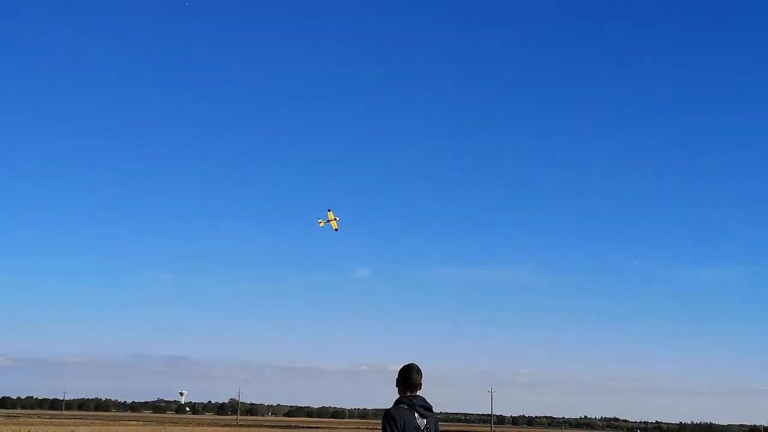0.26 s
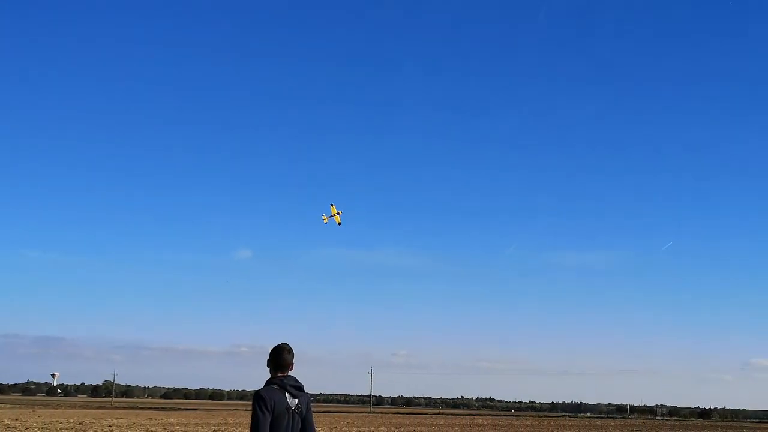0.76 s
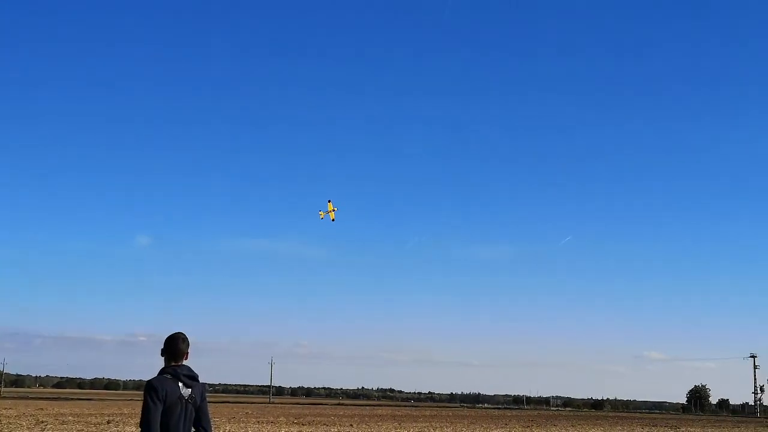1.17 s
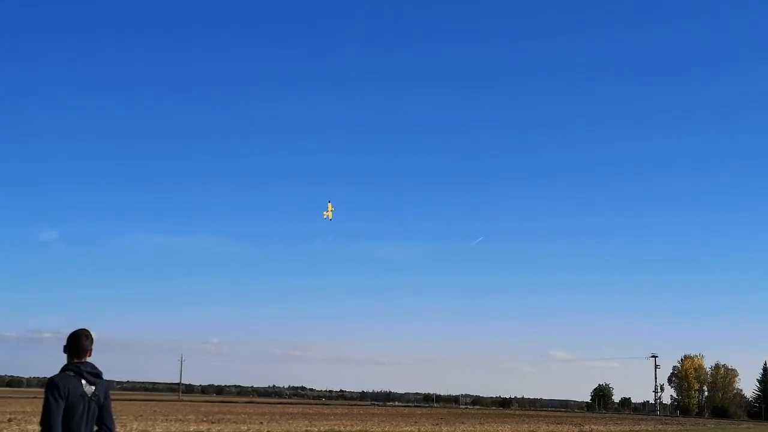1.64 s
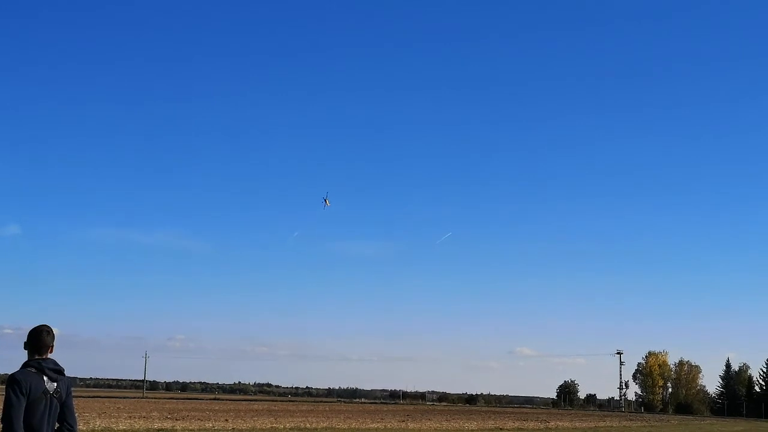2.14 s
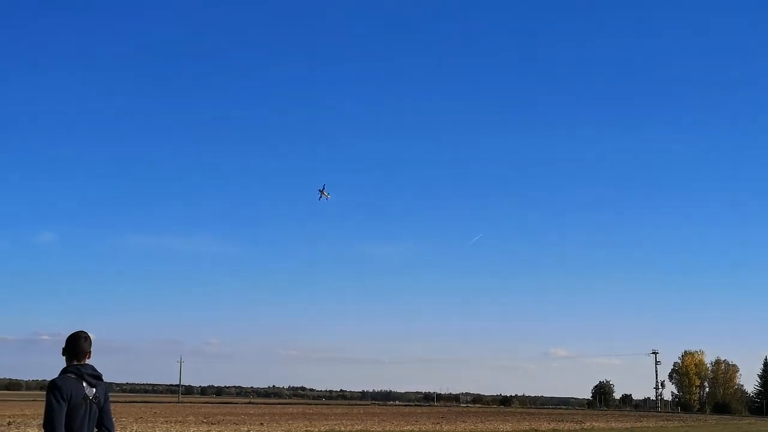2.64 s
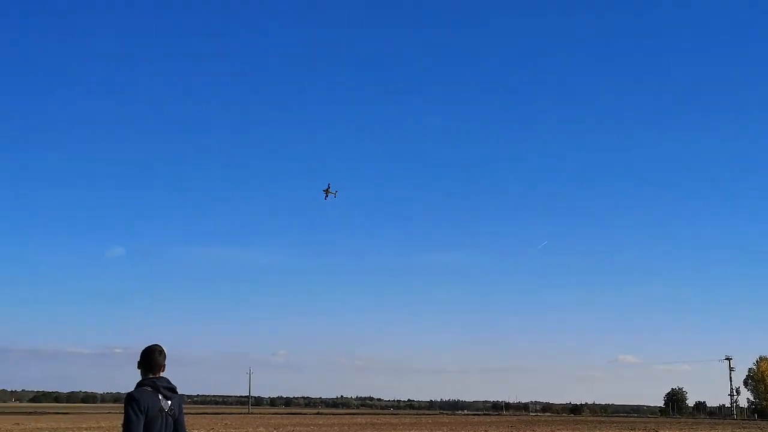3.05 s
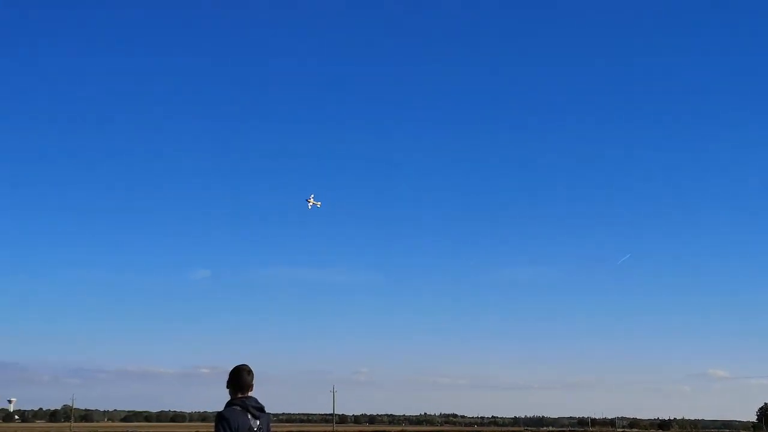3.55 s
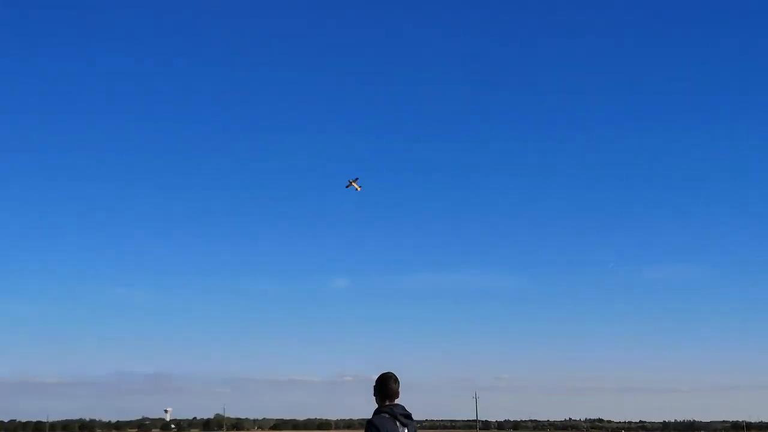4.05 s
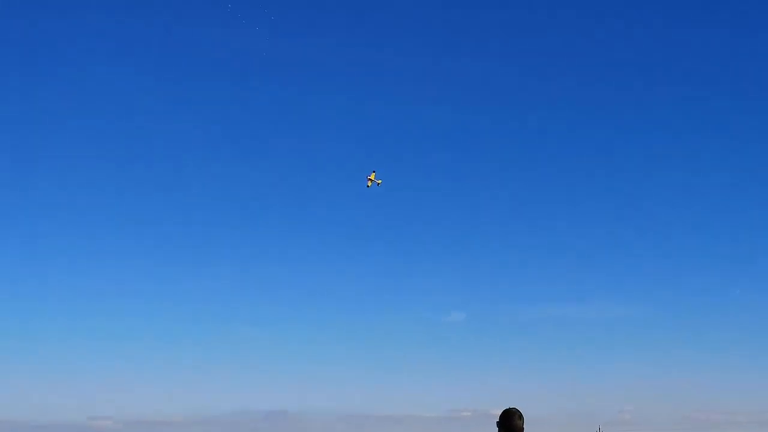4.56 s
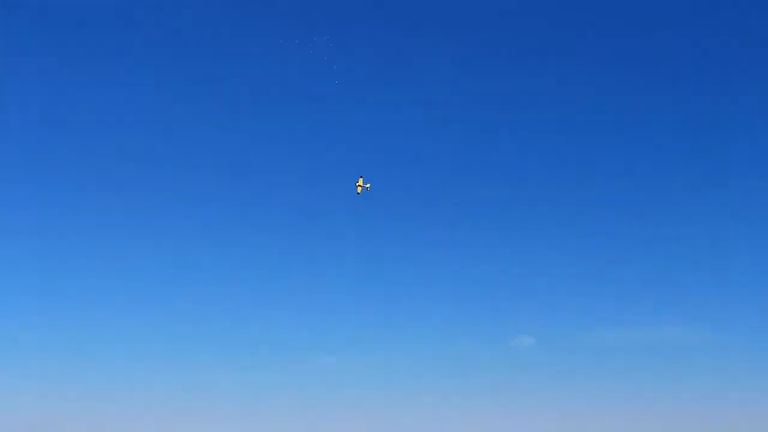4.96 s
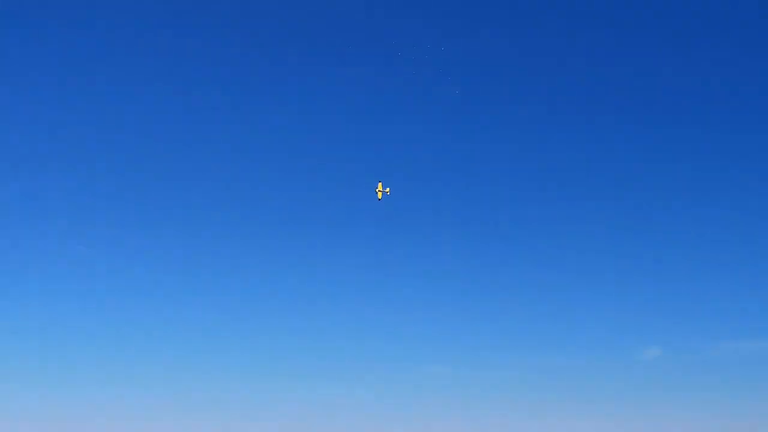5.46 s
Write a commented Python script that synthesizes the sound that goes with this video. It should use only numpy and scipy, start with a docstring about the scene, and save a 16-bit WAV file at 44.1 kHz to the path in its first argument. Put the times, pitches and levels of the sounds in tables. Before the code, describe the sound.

A model plane flies over an open, flat field, heard from the ground in stereo with wind striking the microphone. From 0 to 1 s its single-cylinder two-stroke holds a low, slightly rough buzz around 84 firings a second, with a deep propeller thrum, partly masked by gusts, thuds and brief crackles. It revs up to about 93 by 1.6 s, then eases and stumbles slightly near 1.9 s. Wind flutters again around 2.0-2.5 s while the exhaust stays subdued. From 2.7 s the engine swells strongly, nasal and raspy, loudest around 3-4.3 s, its ringing overtones and hiss sweeping as the plane turns; pitch climbs to about 99. The wind is calmer here, then buffets hard at 4.3-5.0 s. At about 4.8 s the throttle closes: pitch falls quickly to roughly 71, duller, quieter, with uneven alternate firings, rising faintly at the end near 5.7 s.

```python
"""Over an open field, a model aerobatic plane hangs on its propeller, pulls away, then throttles back.
Each firing of its single-cylinder two-stroke rings the exhaust and lets out a rasp of gas; when the
engine stumbles, every other firing is weak and late. The two-bladed propeller thrums and swishes.
The ground mirrors and scatters the sound. Gusty wind, made of shaped noise, buffets the two
microphone ports, over a faint hiss of open air."""
import sys
import numpy as np
from scipy import signal
from scipy.fft import rfft, irfft, next_fast_len
from scipy.io import wavfile
from scipy.ndimage import uniform_filter1d, map_coordinates

SR = 44100
rng = np.random.default_rng(int(sys.argv[2]) if len(sys.argv) > 2 else 0)


def pcm_store(signal):
    """Save signal as 16-bit PCM."""
    levels = np.round(np.clip(np.atleast_2d(signal), -1, 1) * 32767)
    wavfile.write(sys.argv[1], SR, levels.astype(np.int16).T)


N = 251811
T = np.arange(N) / SR  # time in seconds


def plane():
    """Firings and gas ring the exhaust, the propeller thrums and swishes, and the ground adds an echo."""
    turns, pulses = engine()
    thrum, swish = propeller(turns)
    pure, clean, raspy, breathy = drives(pulses, swish)
    direct = top_cut(exhaust(pure, clean, raspy, breathy) + thrum)
    return at_ports(direct) + top_cut(beams(raspy)) * pan(-4)


# engine speed as heard: (time_s, firings_hz)
ENGINE_SPEED = [(0, 83.24), (.45, 84.3), (.68, 84.5), (.8, 85.4), (1.03, 84.04), (1.15, 85.6), (1.3, 89.33),
                (1.53, 93.17), (1.65, 93.36), (1.88, 90.8), (2.15, 88), (2.6, 88.03), (2.8, 89.52),
                (3.2, 90.07), (3.5, 91.1), (3.62, 91.7), (3.76, 93.85), (4.0, 96), (4.2, 97.1),
                (4.35, 99.27), (4.7, 98.06), (4.78, 96.8), (5.0, 78.3), (5.2, 71.12), (5.5, 71.98),
                (5.71, 74.6)]
# how badly the engine stumbles: (time_s, stumble from 0 to 1)
ENGINE_STUMBLE = [(.1, 0.4), (.4, 0.2), (1.0, .3), (1.25, 0), (1.55, 0.06), (1.75, 0.3), (1.92, 0.3),
                  (2.1, 0), (2.7, 0), (4.7, 0), (4.8, 0.5), (5.1, 0.89)]


def engine():
    """The shaft turns at the engine speed and the cylinder fires once a turn."""
    firing_hz, = curves(ENGINE_SPEED)
    stumble = np.clip(curves(ENGINE_STUMBLE)[0], 0, 1)
    turns = np.cumsum(firing_hz) / SR
    pulses = firings(
        turns,
        weak_db=6.5 * stumble,
        late_ms=0.6 * stumble,
        scatter_ms=0.016 + 0.09 * stumble,
        scatter_db=0.95 + 1.4 * stumble)
    return turns, unit(pulses)


def firings(turns, weak_db, late_ms, scatter_ms, scatter_db):
    """One pulse a turn; a weak, late firing follows each strong one when the engine stumbles."""
    count = np.arange(1, int(turns[-1]))
    odd = count % 2  # the strong firings
    timing, strength = rng.standard_normal((len(count), 2)).T
    at = np.searchsorted(turns, count)
    shift_ms = timing * scatter_ms[at] - odd * late_ms[at]
    place = (np.interp(count, turns, T) + shift_ms / 1000) * SR
    size = undb(weak_db[at] * odd + scatter_db[at] * strength)
    # keep the average strength of neighbouring firings steady
    size = size / np.sqrt(uniform_filter1d(size ** 2, size=8))
    # a short sinc places each pulse between samples
    taps = place.astype(int)[:, None] + np.arange(-7, 9)
    pulse = size[:, None] * np.sinc(taps - place[:, None])
    return np.bincount(np.clip(taps, 0, N - 1).ravel(), pulse.ravel(), N)


def drives(pulses, swish):
    """What rings the exhaust: the higher the resonance, the more of its drive is turbulence."""
    puffs = gas(pulses, decay_ms=4.2)
    pure = pulses + 0.04 * puffs + 0.12 * swish
    clean = pulses + 0.07 * puffs + 0.3 * swish
    raspy = pulses + 0.3 * puffs + 0.4 * swish
    breathy = pulses + 1.7 * gas(pulses, decay_ms=2.4) + 0.45 * swish
    return pure, clean, raspy, breathy


def gas(pulses, decay_ms):
    """A puff of turbulent gas that dies away after each firing."""
    pole = np.exp(-1000 / (decay_ms * SR))
    return unit(signal.lfilter([1], [1, -pole], pulses) * rng.standard_normal(N))


# how the exhaust carries as the plane turns, before each layer's own trim:
# (time_s, bark_db, silencer_ring_db, rasp_db, sizzle_db)
EXHAUST_LEVELS = [(0.1, -52, -59, -58.5, -67), (.26, -54, -59, -65, -65), (.39, -53.5, -57, -73, -78.5),
                  (.52, -54.5, -64.5, -70.5, -75.5), (.62, -53.5, -55.5, -63.5, -72),
                  (.92, -64.5, -64.5, -69.5, -70), (1.15, -50.5, -57.5, -74, -79.5),
                  (1.45, -48.5, -59.5, -61, -72), (1.57, -50.5, -55, -63.5, -71),
                  (1.87, -53, -50, -64.5, -68.5), (2.06, -49.5, -59, -66, -69),
                  (2.39, -64.5, -56, -70.5, -71.5), (2.51, -51, -55.5, -75.5, -86),
                  (2.77, -47.5, -40, -56, -74), (2.93, -43, -43.5, -58.5, -67),
                  (3.11, -38, -40, -47.5, -55.5), (3.4, -39.5, -43, -57.5, -60.5),
                  (3.99, -40, -43.5, -46.5, -58), (4.29, -37.5, -51.5, -51.5, -60),
                  (4.42, -45, -46, -62, -67), (4.58, -47.5, -58, -51.5, -63), (4.68, -43, -56.5, -57, -75),
                  (4.79, -44, -53.5, -57.5, -64), (5.05, -63.5, -61.5, -91, -82),
                  (5.15, -54, -59, -76, -77.5), (5.55, -59, -56.5, -86, -82), (5.68, -51.5, -53, -76, -66)]


def exhaust(pure, clean, raspy, breathy):
    """The exhaust rings in layers, from the low bark up to the fizz."""
    bark_db, ring_db, rasp_db, sizzle_db = curves(EXHAUST_LEVELS)
    low = bark(pure, bark_db) + silencer_ring(clean, ring_db) + honk(pure)
    middle = silencer_overtone(clean) + whine(raspy) + rasp(raspy, rasp_db)
    return low + middle + sizzle(breathy, sizzle_db) + fizz(breathy)


# low resonances: (pitch_hz, width_hz, level_db against each other, left_minus_right_db)
BARK_MODES = [(254, 120, 10.5, -6), (507, 210, 4, 5.5), (777, 170, 4, 2.5)]


def bark(drive, level_db):
    """The firings ring the lowest, strongest resonances of the exhaust."""
    return resonate(drive, BARK_MODES) * undb(level_db + 1.5)


# silencer resonance, then evened to rms 1: (pitch_hz, width_hz, level_db, left_minus_right_db)
RING_MODES = [(1833, 355, -13, 0.2)]
# the ring shifts with the plane's heading: (time_s, centre_hz, further left_minus_right_db)
RING_HEADING = [(0.1, 1833, -13), (.65, 1830, -10), (.87, 1703, -3), (1.05, 1790, -12.5), (1.38, 1825, -9),
                (1.6, 1774, 8), (1.85, 1730, -6), (2.3, 1700, -3.5), (2.8, 1650, -5.5), (3.15, 1687, -6.5),
                (3.57, 1700, -7), (3.95, 1834, -9.5), (4.6, 1710, -3.5), (4.85, 1830, -2),
                (5.3, 1727, -5.5)]


def silencer_ring(drive, level_db):
    """The silencer rings, its pitch and side moving with the plane's heading."""
    centre_hz, side_db = curves(RING_HEADING)
    ring = sweep(resonate(drive, RING_MODES), centre_hz, width_hz=120)
    return ring * undb(level_db + 1) * pan(side_db)


# resonances: (pitch_hz, width_hz, level_db against each other, left_minus_right_db)
HONK_MODES = [(1006, 270, 3, 6), (1117, 340, -3.5, 5)]
# how the honk moves as the plane turns, before a 1 dB cut: (time_s, level_db, centre_hz)
HONK_PATH = [(.1, -56.5, 1126), (.55, -61.5, 1078), (1.0, -61.5, 1097), (1.42, -52, 1058),
             (1.6, -60.5, 1118), (2.5, -61.5, 1120), (2.78, -46.5, 1060), (3.14, -43.5, 1090),
             (3.42, -46, 1093), (3.78, -45.5, 1132), (4.0, -39.5, 1152), (4.3, -46.5, 1038),
             (4.68, -53, 1006), (4.79, -46, 956), (5.05, -62.5, 908), (5.68, -55, 1020)]


def honk(drive):
    """A nasal resonance above the bark, its level and pitch moving as the plane turns."""
    level_db, centre_hz = curves(HONK_PATH)
    return sweep(resonate(drive, HONK_MODES), centre_hz, width_hz=240) * undb(level_db - 1)


# resonance, then evened to rms 1: (pitch_hz, width_hz, level_db, left_minus_right_db)
OVERTONE_MODES = [(2203, 260, -8.5, 0)]
# how the overtone moves, before a 4.5 dB cut: (time_s, level_db, centre_hz)
OVERTONE_PATH = [(.1, -72.5, 2136), (1.0, -68, 2204), (1.15, -61.5, 2316), (1.7, -54, 2140),
                 (2.3, -75, 2136), (2.9, -63, 2206), (3.1, -53, 2230), (3.45, -52.5, 2300),
                 (3.65, -54.5, 2200), (3.83, -45.5, 2290), (4.2, -50, 2197), (4.55, -49.5, 2163),
                 (4.65, -63.5, 2120), (4.85, -57, 2210), (5.1, -78, 2210)]


def silencer_overtone(drive):
    """The silencer's overtone, which swells and fades as the plane rocks."""
    level_db, centre_hz = curves(OVERTONE_PATH)
    tone = sweep(resonate(drive, OVERTONE_MODES), centre_hz, width_hz=150)
    return tone * undb(level_db - 4.5 + rocking_db())


# resonance, then evened to rms 1: (pitch_hz, width_hz, level_db, left_minus_right_db)
WHINE_MODES = [(2795, 620, 0, 5)]
# the whine beams out in lobes that sweep past as the plane turns: (time_s, level_db, centre_hz)
WHINE_PATH = [(0.1, -55, 2555), (.32, -60.5, 2666), (.45, -58.5, 2705), (.65, -59.5, 2585),
              (.85, -65, 2535), (1.1, -59.5, 2406), (1.78, -59.5, 2630), (2.05, -60, 2754),
              (2.5, -64.5, 2520), (2.72, -47.5, 2506), (3.1, -46, 2455), (3.6, -59, 2390),
              (4.03, -47, 2950), (4.42, -62.5, 2696), (4.87, -58, 2327), (5.02, -65.5, 2386),
              (5.65, -68.5, 2630)]


def whine(drive):
    """A narrow, high resonance that comes and goes in lobes."""
    level_db, centre_hz = curves(WHINE_PATH)
    tone = sweep(resonate(drive, WHINE_MODES), centre_hz, width_hz=170)
    return tone * undb(level_db + rocking_db())


# resonances: (pitch_hz, width_hz, level_db against each other, left_minus_right_db)
RASP_MODES = [(3340, 640, 1.1, -14), (3900, 670, 1.9, -8.5)]
# the rasp shifts with the plane's heading: (time_s, centre_hz)
RASP_PATH = [(.2, 3440), (1.4, 3314), (2.5, 3396), (3.1, 3570), (3.6, 3570), (3.95, 3420), (4.15, 3730),
             (4.4, 3820), (4.8, 3850)]


def rasp(drive, level_db):
    """Firings and gas ring a wide treble band whose centre moves."""
    centre_hz, = curves(RASP_PATH)
    band = sweep(resonate(drive, RASP_MODES), centre_hz, width_hz=600)
    return band * undb(level_db + rocking_db())


# treble bands: (pitch_hz, width_hz, level_db added to the sizzle, left_minus_right_db)
SIZZLE_MODES = [(5250, 790, -3, -0.5), (5690, 580, -8.5, -6.5)]


def sizzle(drive, level_db):
    """Gas hisses through treble bands that shimmer one by one."""
    return sum(resonate(drive, [mode]) * undb(level_db + mode[2] + shimmer_db())
               for mode in SIZZLE_MODES)


# highest band, then evened to rms 1: (pitch_hz, width_hz, level_db, left_minus_right_db)
FIZZ_MODES = [(7120, 1300, -1, 0.5)]
# loudness of the fizz: (time_s, level_db)
FIZZ_LEVELS = [(0, -65), (.28, -83), (.4, -80.5), (.62, -79), (1.1, -88), (1.38, -89), (1.54, -77),
               (1.67, -81.5), (1.8, -85), (2.03, -77), (2.15, -85.5), (2.35, -72), (2.52, -89), (2.9, -74),
               (3.12, -65), (3.6, -69), (3.8, -68), (4.18, -66.5), (4.42, -75), (4.8, -84), (5.0, -87),
               (5.7, -83)]


def fizz(drive):
    """The highest hiss of the gas, shimmering too."""
    return resonate(drive, FIZZ_MODES) * undb(curves(FIZZ_LEVELS)[0] + shimmer_db())


def rocking_db():
    """The upper resonances swell and fade as the plane rocks."""
    return 3 * walk(6)


def shimmer_db():
    """Moving air makes a treble band swell and fade."""
    return 2.5 * walk(13)


# bands of exhaust that flash past, filtered twice:
# (centre_s, centre_to_edge_s, pitch_hz, width_hz of one filter pass, level_db before a shared pan)
BEAM_EVENTS = [(.18, 0.19, 3430, 600, -63), (.62, .086, 2850, 500, -59.5), (1.26, 0.12, 3550, 330, -64),
               (1.38, 0.11, 2230, 502, -58.5), (1.47, 0.089, 724.3, 330, -47.5),
               (1.56, .09, 4800, 1470, -61.5), (1.75, 0.054, 2042, 400, -61.5),
               (1.77, 0.054, 4300, 2440, -64), (2.12, 0.23, 3570, 330, -66.5),
               (2.38, 0.13, 3494, 397.1, -58), (2.87, .14, 5480, 500.6, -70.5),
               (2.93, .12, 2664, 329.5, -64), (3.13, 0.18, 3985, 450, -59), (3.24, .17, 5835, 698.7, -72),
               (3.554, 0.083, 3690, 800, -55), (3.8, .07, 5520, 899, -60), (3.89, .1, 1876, 160.1, -45),
               (4.199, 0.21, 575.1, 120, -52), (4.13, .08, 4036, 900, -52.5), (4.16, .13, 4476, 700.2, -67),
               (4.17, .1, 5850, 700, -70), (4.54, 0.031, 2678, 328.5, -57), (4.68, 0.096, 2887, 332, -59.5),
               (4.83, 0.1, 4473, 1300, -66)]


def beams(drive):
    """Bands of the exhaust that swell and fade, each at its own moment."""
    total = np.zeros(N)
    for centre_s, length_s, pitch_hz, width_hz, level_db in BEAM_EVENTS:
        steady_hz = np.full(N, pitch_hz)
        once = sweep(drive, steady_hz, width_hz)
        total += sweep(once, steady_hz, width_hz) * swells([(centre_s, length_s, level_db)])
    return total


# the propeller: (time_s, thrum_db before a 1.5 dB lift,
# swish_db relative to the firings before each drive takes its share)
PROPELLER_LEVELS = [(0, -29.5, 2), (.8, -30.5, 4), (1.4, -35.5, 2), (1.8, -39.5, 11.5),
                    (2.25, -34.5, -13.5), (2.75, -30, 2), (3.6, -31, -0.5), (4.6, -57, 1), (4.85, -46, 12),
                    (5.1, -43, -17), (5.7, -26, -17)]


def propeller(turns):
    """Two blades a turn make a low thrum; their rushing air throbs once a turn."""
    thrum_db, swish_db = curves(PROPELLER_LEVELS)
    thrum = np.sin(4 * np.pi * turns) + 0.055 * np.sin(8 * np.pi * turns)
    throb = 1 + 0.22 * np.cos(2 * np.pi * turns)
    swish = rng.standard_normal(N) * undb(swish_db) * throb
    return thrum * undb(thrum_db + 1.5), swish


def top_cut(x):
    """The top above about 8 kHz falls away steeply."""
    return lowpass(x, 7900, order=12)


# lag of the ground echo as the plane climbs and sinks: (time_s, lag_ms before each port's own shift)
ECHO_LAG = [(0, 1.71), (.7, 1.61), (1.15, 1.71), (1.6, 1.51), (2.2, 1.68), (3.3, 1.74), (4.2, 1.822),
            (4.7, 1.92), (5.0, 2.23), (5.7, 2.42)]
CAVITY_HZ, CAVITY_WIDTH_HZ = 2930, 390


def at_ports(direct):
    """The ground mirrors the sound, and each port hears the echo at its own moment."""
    lag_ms, = curves(ECHO_LAG)
    mirrored = lowpass(direct, 4500)  # grass swallows treble
    left = direct[0] + 0.68 * delay(mirrored[0], lag_ms - 0.07)
    right = direct[1] + 0.68 * delay(mirrored[1], lag_ms + 0.077)
    # a cavity behind the right port turns the phase around its resonance
    peak = signal.iirpeak(CAVITY_HZ, CAVITY_HZ / CAVITY_WIDTH_HZ, fs=SR)
    return np.array([left, right - 2 * signal.lfilter(*peak, right)])


# rough ground scatters the sound: (time_s, scatter_db relative to the unscattered sound)
SCATTER_LEVELS = [(0, 0.5), (1.5, 1.5), (2.4, -7), (3.1, -6.5), (4.4, -14), (5.5, -13.5)]


def scattered(x):
    """Many small reflections that smear each firing but keep its pitch."""
    ms = T[:2048] * 1000
    tail = rng.standard_normal((2, len(ms))) * np.exp(-ms / 9)  # dies away over 9 ms
    tail = tail / np.sqrt(np.sum(tail ** 2, axis=1, keepdims=True))
    return signal.fftconvolve(x, tail, axes=1)[:, :N] * undb(curves(SCATTER_LEVELS)[0])


# strength of the wind, used relative to its mean: (time_s, strength_db)
WIND_STRENGTH = [(0, -28), (.2, -34), (.33, -26), (.6, -32), (.8, -36), (.9, -28.5), (1.25, -28.5),
                 (1.5, -32.5), (1.88, -38), (1.97, -57), (2.03, -30.5), (2.27, -27.5), (2.55, -32.5),
                 (2.68, -38), (2.88, -39), (3.05, -52), (3.45, -41), (3.88, -41.5), (4.12, -39.5),
                 (4.28, -27.5), (4.55, -26.5), (4.7, -32.5), (4.93, -27.5), (5.17, -40), (5.7, -31.5)]
MEAN_WIND_DB = -34
# large eddies that thump the microphone:
# (centre_s, centre_to_edge_s, thud_db, carried_db of the smaller eddies that ride along)
THUMP_EVENTS = [(0.399, 0.023, -27, -15), (0.487, 0.025, -14, -19), (0.903, 0.028, -30, -14),
                (1.014, 0.011, -11, -10.5), (1.067, 0.014, -18.5, -25), (1.172, 0.022, -28, -13),
                (1.326, 0.021, -17.5, -13.5), (1.886, 0.033, -20.5, -18.5), (3.208, 0.036, -15.5, -23.5),
                (3.655, 0.11, -17.5, -29.5), (3.974, 0.018, -13, -17.5), (4.454, 0.021, -14, -24),
                (4.596, 0.014, -8, -18), (4.919, 0.019, -14, -18.5), (5.005, 0.018, -7.5, -20.5),
                (5.041, 0.015, -11, -27), (5.652, .014, -25, -18.5)]
LEE_HZ, LEE_SHARE = 235, 0.62


def wind():
    """Large eddies press on both ports alike; small ones push the ports against each other."""
    stronger_db = curves(WIND_STRENGTH)[0] - MEAN_WIND_DB
    thuds = swells((s, length, thud_db) for s, length, thud_db, _ in THUMP_EVENTS)
    carried = swells((s, length, carried_db) for s, length, _, carried_db in THUMP_EVENTS)
    left, right = rumble(stronger_db, thuds) + crackle() + small_eddies(stronger_db, carried)
    # the right port lies in the lee: small eddies reach it weaker and as suction
    large = lowpass(right, LEE_HZ)
    return np.array([left, large - LEE_SHARE * (right - large)])


# colour of the rumble: (pitch_hz, density_db per Hz before evening)
RUMBLE_SPECTRUM = [(10, -18), (22, 4), (35, -1), (60, 0.5), (95, -1.5), (150, -9), (220, -20), (400, -50.5),
                   (2000, -100)]


def rumble(stronger_db, thuds):
    """Low noise of the large eddies, which change less than the wind does."""
    steady = undb(-22 + 0.34 * stronger_db + 2.27 * walk(17))
    return even(noise(RUMBLE_SPECTRUM), ms=58) * np.hypot(steady, thuds)


# colours of the middle and the smallest eddies: (pitch_hz, density_db per Hz before evening)
BUFFET_SPECTRUM = [(40, -9.5), (100, 2.5), (170, 2.5), (280, -3), (400, -13.5), (600, -33.5), (1000, -48.5),
                   (2000, -65), (5000, -68), (12000, -103.5)]
FLUTTER_SPECTRUM = [(30, -47), (100, -21.5), (300, 12), (500, 1), (800, -6.5), (1300, -18), (2500, -30.5),
                    (6000, -45), (12000, -77.5)]
# sharp gusts, before a 9 dB lift: (centre_s, centre_to_edge_s, level_db)
GUST_EVENTS = [(.272, .015, -32.5), (.33, .012, -38), (.385, 0.01, -32), (.408, 0.027, -30.5),
               (.461, 0.011, -37), (.487, 0.017, -32.5), (.59, .012, -38.5), (.657, .01, -38),
               (.73, 0.024, -39), (.872, 0.012, -32.5), (.914, 0.022, -34.5), (1.003, 0.0066, -37),
               (1.083, .01, -36), (1.112, 0.0092, -35), (1.15, 0.036, -32.5), (1.212, .014, -39),
               (1.256, .01, -50), (1.292, .014, -37), (1.328, 0.026, -41.5), (1.878, 0.011, -29.5),
               (2.165, .012, -39), (2.21, 0.0094, -32.5), (2.257, 0.01, -36.5), (2.341, 0.0086, -31),
               (2.44, .012, -54), (4.332, .016, -38), (4.403, 0.017, -29), (4.46, 0.013, -34),
               (4.505, 0.016, -33), (4.572, 0.019, -28), (4.602, .011, -31), (5.002, 0.016, -37.5),
               (5.04, .012, -43), (5.645, .014, -50)]


def small_eddies(stronger_db, carried):
    """Buffets and flutter come in bursts, mostly shared by the ports and partly their own."""
    bursts = unit(undb(3.65 * walk(55)))
    buffet = np.hypot(undb(-27 + stronger_db) * bursts, carried)
    # the smallest eddies grow faster than the wind does, and tear off raggedly
    gusts = undb(9) * swells(GUST_EVENTS)
    ragged = unit(undb(1.1 * walk(170)))
    flutter = np.hypot(gusts, undb(-46.5 + 1.9 * stronger_db) * bursts) * ragged
    shared, *own = (even(noise(BUFFET_SPECTRUM), ms=35) * buffet
                    + even(noise(FLUTTER_SPECTRUM), ms=7.2) * flutter for _ in range(3))
    return shared + 0.25 * np.array(own)


# the most abrupt gusts: (centre_s, centre_to_edge_s, level_db)
CRACKLE_EVENTS = [(.458, .003, -45), (.87, .012, -42), (4.568, .006, -37)]
# colour of the crackle: (pitch_hz, density_db per Hz before scaling to rms 1)
CRACKLE_SPECTRUM = [(300, -14), (900, -4.5), (2500, -13.5), (6000, -23), (9000, -47)]


def crackle():
    """Abrupt gusts crackle in the ports as short bursts of noise."""
    return noise(CRACKLE_SPECTRUM) * swells(CRACKLE_EVENTS)


# colour of the open air: (pitch_hz, density_db per Hz before scaling to rms 1)
FIELD_SPECTRUM = [(100, -10.5), (500, -26.5), (1000, -6.5), (2000, -13), (4000, -23.5), (7500, -40),
                  (9000, -42), (15000, -46.5)]


def field():
    """Faint, even hiss of the open air, partly different at each port."""
    own = np.array([noise(FIELD_SPECTRUM), noise(FIELD_SPECTRUM)])
    return undb(-57.5) * (noise(FIELD_SPECTRUM) + 0.5 * own)


def undb(db):
    """Decibels to gain."""
    return 10 ** (np.asarray(db) / 20)


def unit(x):
    """Scale to rms 1."""
    return x / np.sqrt(np.mean(x ** 2))


def curves(table):
    """The columns of a table, joined by straight lines in time."""
    s, *columns = np.transpose(table)
    return [np.interp(T, s, column) for column in columns]


def pan(db):
    """Left and right gains for a level difference."""
    return undb(np.array([[1], [-1]]) * db / 2)


def lowpass(x, hz, order=1):
    """Keep what lies below a pitch."""
    return signal.sosfilt(signal.butter(order, hz, fs=SR, output="sos"), x)


def noise(spectrum):
    """Noise of rms 1 with the given spectrum."""
    hz, db = np.transpose(spectrum)
    size = next_fast_len(N)
    f = np.maximum(np.arange(size // 2 + 1) * SR / size, 1)
    gain = undb(np.interp(np.log(f), np.log(hz), db))
    return unit(irfft(rfft(rng.standard_normal(size)) * gain, size)[:N])


def walk(rate):
    """Smooth chance with rms 1, changing about rate times a second."""
    k = max(int(SR / rate), 2)
    steps = np.repeat(rng.standard_normal(N // k + 1), k)
    return unit(uniform_filter1d(steps, k)[:N])


def delay(x, ms):
    """The sound a fixed or moving time later."""
    return map_coordinates(x, [(T - ms / 1000) * SR], order=3)


def resonate(x, modes):
    """Steep-sided resonances, each with its own place between left and right; rms 1."""
    size = 4096
    f = np.maximum(np.arange(size // 2 + 1) * SR / size, 1)
    power = 1e-9
    for hz, width_hz, db, side_db in modes:
        detuning = (f / hz - hz / f) * hz / width_hz
        power = power + (undb(db) * pan(side_db) / (1 + detuning ** 2)) ** 2
    # minimum phase: it rings after the blow, never before
    cepstrum = irfft(np.log(power) / 2)[:, 1:size // 2]
    response = irfft(np.exp(rfft(2 * np.pad(cepstrum, [(0, 0), (1, 0)]), size)))
    return unit(signal.fftconvolve(x[None], response, axes=1)[:, :N])


def sweep(x, hz, width_hz):
    """A resonance whose centre moves: shift down to zero, low-pass, shift back; rms 1."""
    carrier = np.exp(2j * np.pi * np.cumsum(hz) / SR)
    return unit((lowpass(x / carrier, width_hz / 2) * carrier).real)


def swells(table):
    """Gain of a smooth rise and fall around each event."""
    return sum(undb(db) * np.exp(-2 * ((T - s) / length) ** 2) for s, length, db in table)


def even(x, ms):
    """Take the chance swells out of a noise, so that an event keeps its strength."""
    return x / np.sqrt(uniform_filter1d(x ** 2, max(int(ms * SR / 1000), 2)) + 1e-6)


def scene():
    """The plane above the field, wind close by."""
    heard = plane()
    return heard + scattered(heard) + wind() + field()


def record(dry):
    """The recorder rounds the loudest peaks and cuts the top above 15700 Hz."""
    rounded = np.tanh(1.114 * dry) / 1.067
    return signal.sosfilt(signal.ellip(8, 0.2, 70, 15700, fs=SR, output="sos"), rounded)


dry = scene()
out = record(dry)
pcm_store(out)
```